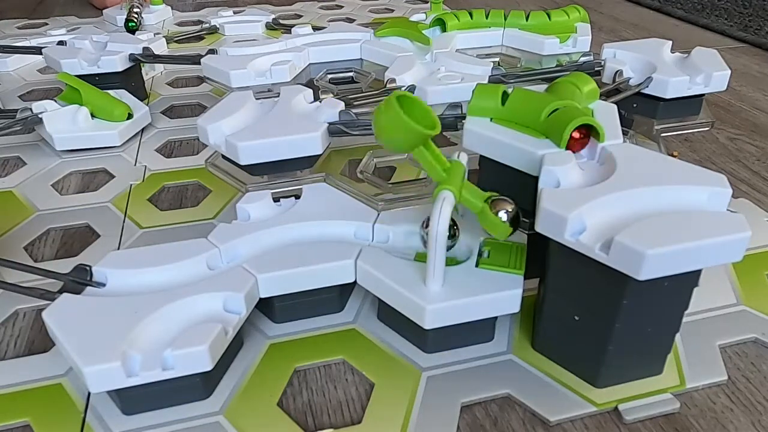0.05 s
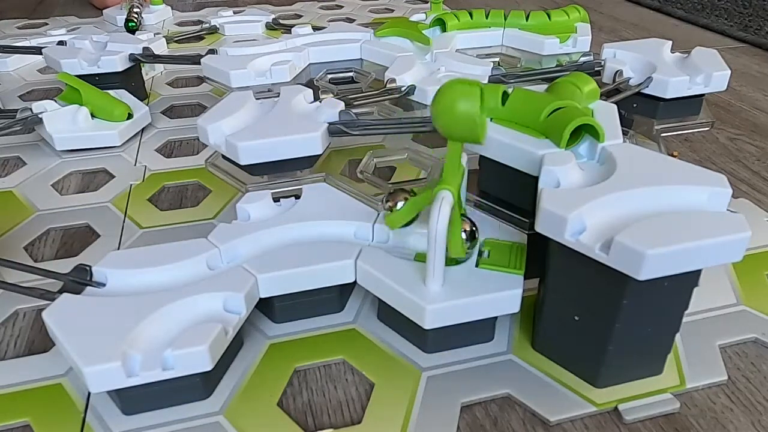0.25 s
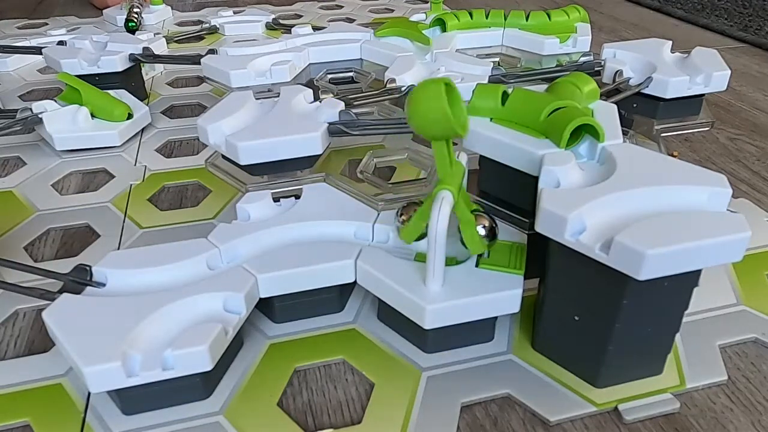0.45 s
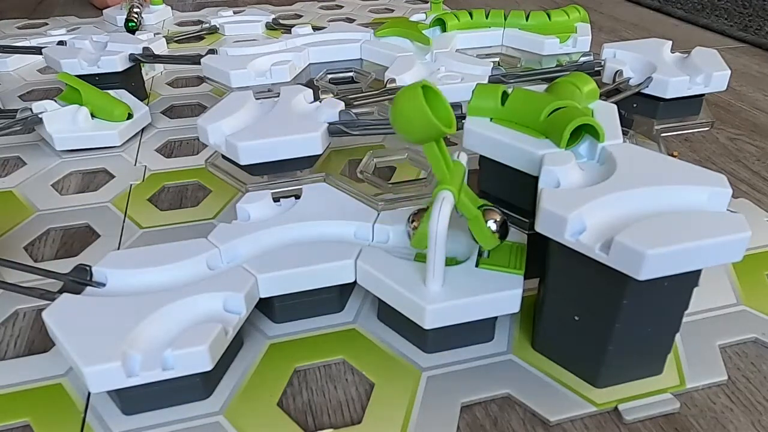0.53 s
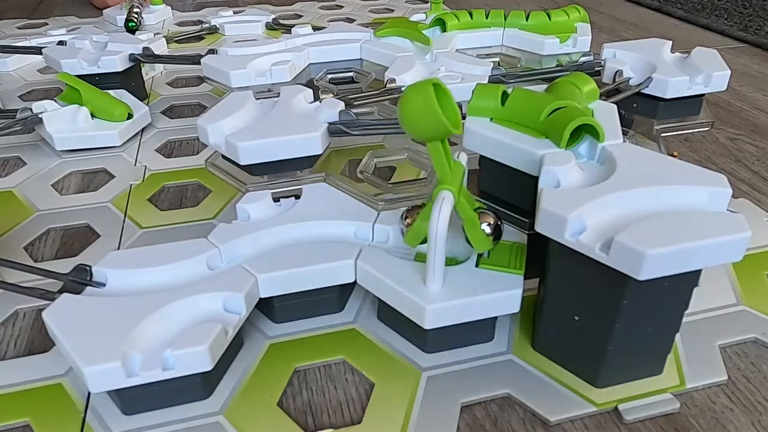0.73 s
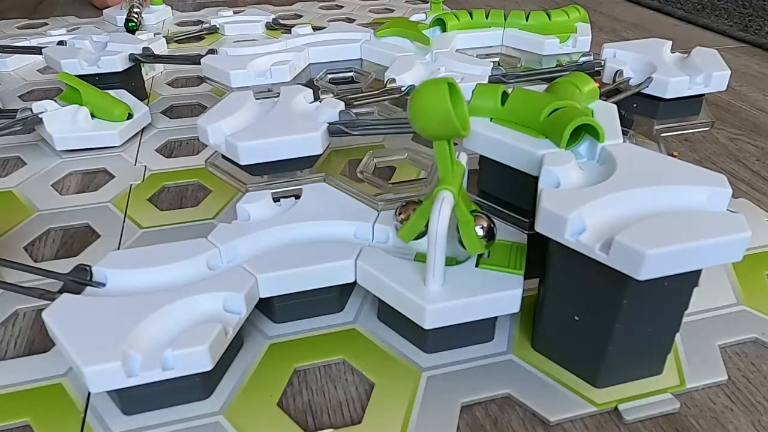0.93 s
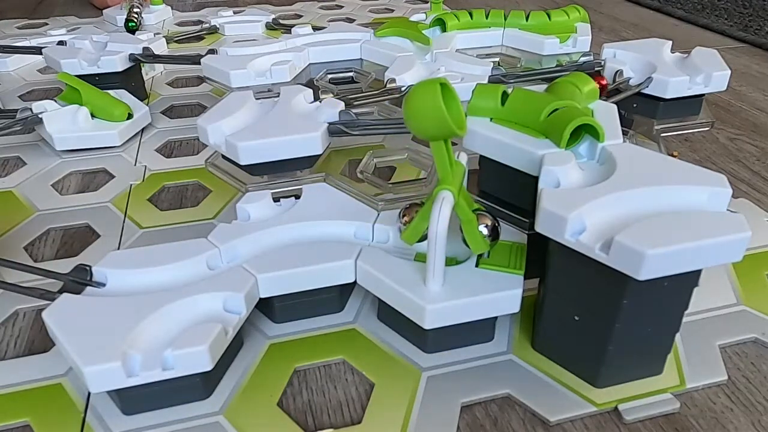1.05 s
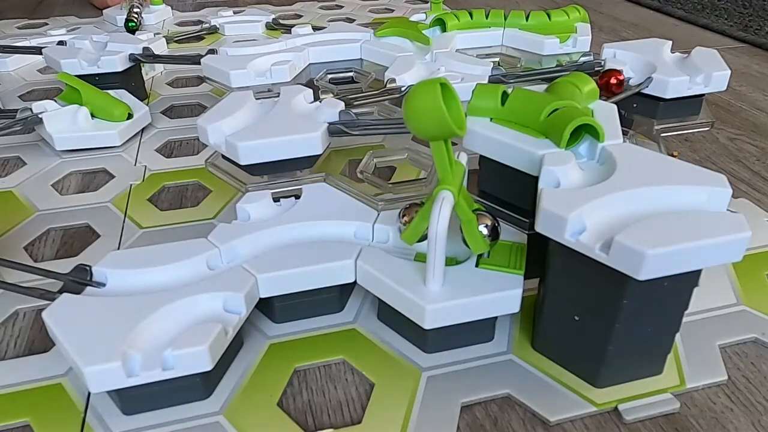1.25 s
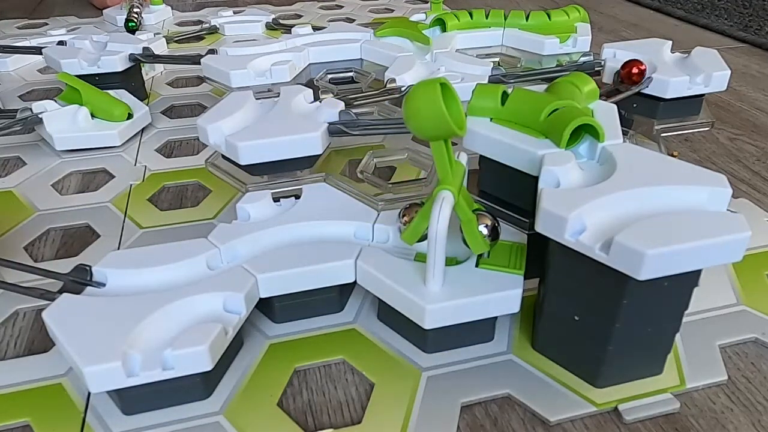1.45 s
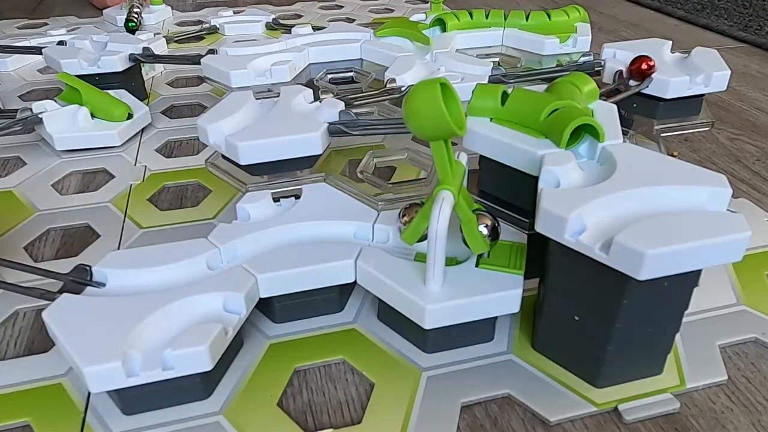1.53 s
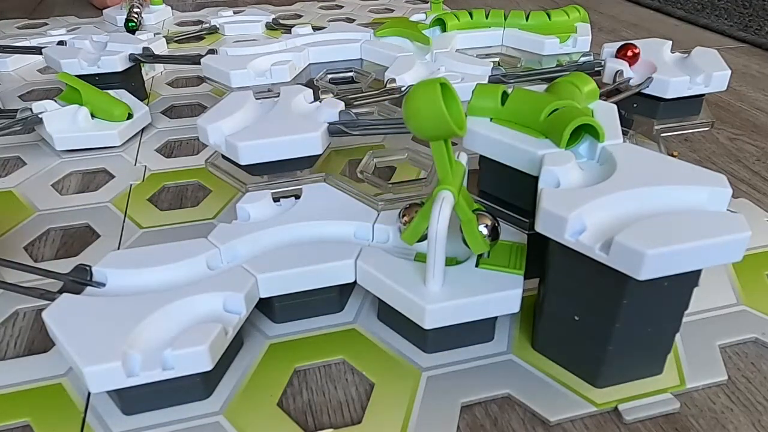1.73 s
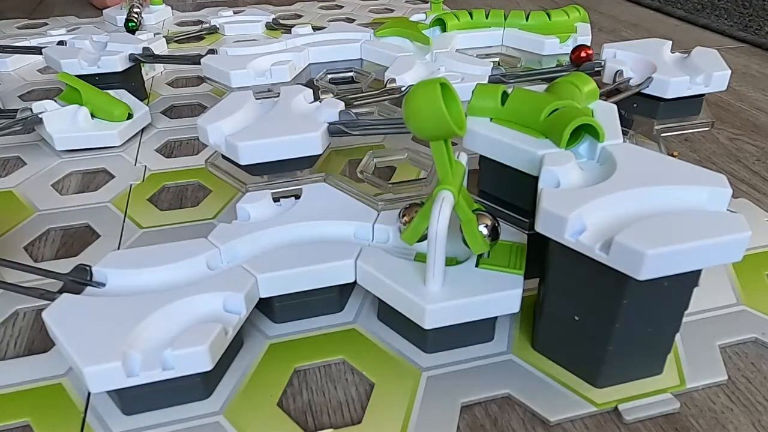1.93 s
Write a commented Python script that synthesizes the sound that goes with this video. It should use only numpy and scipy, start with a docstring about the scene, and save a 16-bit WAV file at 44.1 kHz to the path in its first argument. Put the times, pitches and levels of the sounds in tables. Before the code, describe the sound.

Sharp clacks come from a marble run's swinging plastic lever near the microphone, fading into light taps and chattering steel balls. Then, in the quiet room, a more distant marble ticks over rail joints and rattles into a plastic piece.

```python
"""On the floor of a quiet room, a plastic marble run, close to the microphone and a little to its right.
A lever weighted with steel balls swings down, strikes hard and clacks back and forth until it settles.
Farther off, a marble rolls along a metal rail, knocks over the joints and drops into a hollow plastic
tile. Each contact is a push and a brief rattle coloured by the struck part; lever, cup and rail also
ring at their modes. Faint room noise and a low hum lie underneath."""
import sys
import numpy as np
from scipy import signal
from scipy.fft import rfft, irfft, next_fast_len
from scipy.io import wavfile
from scipy.ndimage import uniform_filter1d, map_coordinates

SR = 44100
rng = np.random.default_rng(int(sys.argv[2]) if len(sys.argv) > 2 else 0)


def master(y):
    """Save y as 16-bit WAV."""
    cut = np.clip(np.atleast_2d(y).T, -1, 1)
    pcm = np.round(cut * 32767)  # scale
    wavfile.write(sys.argv[1], SR, pcm.astype(np.int16))


N = 88200
BLOW_SAMPLES = 8192
T = np.arange(BLOW_SAMPLES) / SR
HZ = np.fft.rfftfreq(BLOW_SAMPLES, 1 / SR)
RISE_S = .0007  # a brief rise that softens the start of each rattle and ping

# spectrum of the room noise: f/Hz, level/dB
AIR_SPECTRUM = [(20, 0.5), (33, -2), (50, -12.5), (75, -8.5), (130, -2), (180, -18.5), (300, -21),
                (700, -27), (2000, -41), (4000, -48.5), (7000, -55), (9500, -69.5)]
# course of the low hum: t/s, level/dB
HUM_LEVEL = [(0, -65), (.6, -63.5), (1, -60), (1.3, -67.5), (1.55, -70.5), (1.72, -60), (1.85, -52),
             (2, -66.5)]
# balls rolling on the plastic track: t/s, level/dB
TRACK_ROLL = [(0, -60.5), (.09, -52.5), (.13, -51.5), (.2, -47.5), (.33, -44.5), (.42, -43), (.5, -48),
              (.62, -56), (.78, -49), (.9, -41.5), (1.02, -76), (1.18, -72), (1.3, -82)]
# balls chattering as the lever settles: t/s, level/dB, brightness/(dB/octave), rattle t60/s
BALL_CHATTER = [(.7655, -45.5, 1, .02), (.772, -49, -3, 0.05), (.779, -41, -3, 0.026),
                (.795, -46, -1.5, .015), (.8145, -40, -1.5, 0.036), (.8315, -45, 1, 0.011),
                (.844, -30, 3, 0.079), (.8505, -35.5, -2, 0.035), (.8575, -37.5, 0.5, .02),
                (.866, -35, -1, 0.02), (.875, -31.5, 0.5, 0.035), (.8815, -60, 13.5, 0.033),
                (.9, -55, 2, 0.044), (.9185, -43, -3.5, .03), (.964, -44.5, -1.5, .02),
                (.9975, -45, -1.5, 0.0077), (1.03, -52.5, -0.5, .025), (1.054, -55.5, -4, 0.017),
                (1.102, -57, -5.5, 0.029)]
# response of the plastic under the balls: f/Hz, level/dB
SEAT_BODY = [(40, -45.5), (200, -25), (500, -16), (820, -4), (1000, -10.5), (1230, 0.5), (1550, -9),
             (2000, 3.5), (2230, -1), (2600, -12), (3600, -22), (5000, -26.5), (5800, -36), (8000, -48.5),
             (10000, -77.5)]
# a steel ball clicking into its plastic cup: t/s, level/dB, brightness/(dB/octave), rattle t60/s
CUP_CLICKS = [(.0435, -27, 0, 0.024), (.056, -40, -11.5, .02), (.111, -43.5, 16, .04),
              (.1365, -34.5, -1, .04)]
# response of the cup: f/Hz, level/dB
CUP_BODY = [(50, -42.5), (250, -21), (800, -20.5), (1150, -7.5), (1800, -4.5), (2650, -10.5), (3000, -4),
            (3350, -12.5), (3750, -4.5), (4050, -11), (4450, -11.5), (4850, -24), (6000, -28.5),
            (8500, -41), (10000, -61.5)]
# modes of the cup: f/Hz, level/dB against the click, t60/s
CUP_MODES = [(1784, -10, .02), (3794, -8, .04)]
# soft bumps in the deep bass: t/s, level/dB
BASS_BUMPS = [(.1, -41.5), (1.219, -41.5)]
# the base plate giving under heavy blows: t/s, level/dB
PLATE_THUDS = [(.2178, -20), (.362, -31), (.378, -30), (.456, -38.5), (.528, -32.5)]
# the plate rumbling under the moving balls: t/s, level/dB
PLATE_ROLL = [(0, -91), (.13, -47), (.2, -56.5), (.34, -41), (.46, -42.5), (.62, -59), (.83, -67),
              (.91, -49.5), (1.05, -72.5), (1.3, -82)]
# response of the plate: f/Hz, level/dB
PLATE_BODY = [(30, -44), (70, -27), (130, -9), (200, -10.5), (330, -8.5), (500, -6.5), (700, -0.5),
              (950, 1), (1600, -23.5), (5000, -68.5)]
# lever and balls clacking on the track: t/s, level/dB, brightness/(dB/octave), rattle t60/s
TRACK_CLACKS = [(.1025, -37, -1, 0.06), (.119, -34, 3, 0.1), (.2975, -32.5, -1, .014),
                (.357, -27, 6, 0.038), (.3635, -25.5, 1, 0.12), (.378, -26, -7, 0.063),
                (.386, -27.5, -2, 0.067), (.456, -30.5, -3.5, 0.033), (.5093, -23, -1.5, 0.036),
                (.516, -27.5, 4, 0.025), (.5208, -22, 3, 0.038), (.529, -32.5, -0.5, 0.04),
                (.5435, -30.5, 0.5, 0.086)]
# response of the track: f/Hz, level/dB
TRACK_BODY = [(40, -43.5), (150, -25), (400, -11.5), (800, -8), (1150, 1.5), (1450, -5), (1700, 1),
              (2200, 5), (2700, -11), (2950, -9.5), (3170, -8), (3450, -8.5), (4000, -15.5), (4700, -19),
              (5050, -15.5), (5700, -28), (7300, -27.5), (9000, -42), (10000, -61.5)]
# strikes of the lever: t/s, level/dB, brightness/(dB/octave)
LEVER_STRIKES = [(0.2123, -11.5, 2), (0.2166, -20, 2.5), (.2445, -32.5, -4), (.297, -35.5, -2),
                 (.322, -37, 0)]
# modes of the lever: f/Hz, level/dB, t60/s
LEVER_MODES = [(738, -19, 0.056), (936, -11.5, 0.046), (1060, 0.5, 0.023), (1037, -8.5, .04),
               (1056, -19.5, 0.31), (1307, -14, 0.026), (1650, -6.5, .03), (1686, -26, 0.41),
               (2320, -13, .016), (2538, -7, 0.0072), (2820, -8.5, .01), (2980, -3.5, 0.0078),
               (3065, -8, 0.025), (5050, -20, .02), (6400, -20, .01)]
# spectrum of the strike's crack: f/Hz, level/dB
CRACK_SPECTRUM = [(200, -27), (900, 8), (3000, 6), (3800, -17), (6500, -8), (8500, -24), (10000, -48.5)]
# light taps of the lever's arm: t/s, level/dB, brightness/(dB/octave), rattle t60/s
ARM_TAPS = [(.6557, -38, -3.5, 0.036), (.6617, -27, -1, 0.026), (.729, -44.5, -7, .02),
            (.7547, -36, -1, 0.018)]
# response of the arm: f/Hz, level/dB
ARM_BODY = [(50, -42), (400, -24), (850, -14.5), (1150, -3), (1650, -1.5), (2250, 2), (2650, -7.5),
            (2930, -10.5), (3150, -1), (3500, -11.5), (3800, -20.5), (4700, -25.5), (5000, -18.5),
            (5700, -35), (7400, -31.5), (10000, -67)]
# modes of the arm: f/Hz, level/dB against the tap, t60/s
ARM_MODES = [(1637, -7.5, 0.032), (3162, -12.5, 0.03)]
# the marble rolling on the rail: t/s, level/dB
RAIL_ROLL = [(0, -99), (1.15, -78.5), (1.25, -62), (1.34, -82), (1.53, -76.5), (1.6, -63), (1.7, -63.5),
             (1.78, -57.5), (1.89, -61), (1.92, -59), (2, -70)]
# its knocks over the joints: t/s, level/dB, brightness/(dB/octave), rattle t60/s
JOINT_KNOCKS = [(1.221, -45.5, 4, 0.088), (1.231, -46, -3.5, 0.049), (1.556, -42, 2, .06),
                (1.5725, -42.5, 0, 0.072), (1.587, -46, -3.5, 0.058), (1.7345, -41, 4, .04),
                (1.749, -44.5, -0.5, .04), (1.7555, -36.5, 0.5, 0.046)]
# response of the rail: f/Hz, level/dB
RAIL_BODY = [(50, -35.5), (250, -11.5), (470, -12.5), (620, 4.5), (800, 1.5), (1100, -5), (1380, -17.5),
             (1650, -6.5), (2000, -8.5), (2220, -6), (2450, -13.5), (2900, -15.5), (3750, -15), (4010, -9),
             (4250, -20.5), (4700, -18.5), (5400, -30.5), (7500, -42.5), (10000, -64.5)]
# modes of the steel rail: f/Hz, level/dB against the knock, t60/s
RAIL_MODES = [(2145, -21, .15), (4016, -27, 0.1)]
# the marble's bounces in the tile: t/s, level/dB, brightness/(dB/octave), rattle t60/s
TILE_BOUNCES = [(1.903, -31.5, 0.5, 0.11), (1.913, -33, -5, 0.087), (1.935, -36, -7, 0.016),
                (1.942, -35.5, 1.5, 0.068), (1.9555, -31, 0, 0.063), (1.9615, -34, 3, 0.017),
                (1.975, -33, 0, 0.13)]
# response of the hollow tile: f/Hz, level/dB
TILE_BODY = [(50, -53), (230, -18), (340, -4.5), (430, -3.5), (520, 1), (800, 3), (1150, -2), (1450, -16),
             (1650, -12), (2000, -19), (2400, -16), (3000, -23), (3750, -18.5), (3980, -7.5), (4250, -31),
             (4600, -25), (5500, -34.5), (7500, -47.5), (10000, -66)]
# reverberation time of the room: f/Hz, t60/s
ROOM_DECAY = [(100, .45), (500, 0.32), (1400, 0.66), (3500, 0.65), (9000, .32)]
# colour of the reverberation: f/Hz, level/dB
ROOM_COLOUR = [(100, 7), (500, -10), (1000, -4.5), (2200, -13.5), (4000, -11.5), (9000, -13)]
# likeness of the room's sound left and right: f/Hz, correlation
ROOM_COHERENCE = [(100, 0.88), (400, 0.34), (900, .45), (1800, 0.2), (9000, 0.2)]
# direct sound at the microphone, left minus right: f/Hz, level/dB
MIC_BALANCE = [(100, -3.5), (1000, -1.2), (2200, 0.5), (3000, -2), (3900, 0), (5000, -7.5), (6000, -8.5),
               (7500, -5), (9000, -6.5)]


def amp(db):
    """Decibels to gain."""
    return 10 ** (np.asarray(db) / 20)


def unit(x):
    """Scale to rms 1."""
    return x / np.sqrt(np.mean(x ** 2) + 1e-20)


def along(points, hz):
    """Read (f/Hz, value) points on a log frequency axis."""
    freqs, values = np.transpose(points)
    return np.interp(np.log(hz + 1), np.log(freqs + 1), values)


def level(points):
    """Gain per sample from (t/s, level/dB) points."""
    return amp(np.interp(np.arange(N) / SR, *np.transpose(points)))


def fade(t, t60):
    """Exponential decay, 60 dB down at t60."""
    return np.exp(-np.log(1000) * t / t60)


def filtered(x, response):
    """Filter x by a function of frequency."""
    size = next_fast_len(N + SR // 2)
    return irfft(rfft(x, size) * response(np.fft.rfftfreq(size, 1 / SR)), size)[..., :N]


def coloured(x, db):
    """A short sound through a minimum-phase filter with these gains."""
    cepstrum = irfft(np.log(amp(db)))
    cepstrum[1:BLOW_SAMPLES // 2] *= 2
    cepstrum[BLOW_SAMPLES // 2 + 1:] = 0
    return irfft(rfft(x) * np.exp(rfft(cepstrum)))


def tilt(db_per_octave):
    """Spectral slope in dB: a harder contact is brighter."""
    return db_per_octave * np.log2(np.clip(HZ, 400, 8000) / 1500)


def add_blow(out, at_s, db, blow):
    """Place a blow; its level is its energy spread over 5 ms."""
    start = round(at_s * SR)
    blow = blow[:N - start] * amp(db) * np.sqrt(.005 * SR) / np.linalg.norm(blow)
    out[start:start + len(blow)] += blow


def contact(body, bright, t60, push):
    """One push and a dense, quickly dying rattle, evened in spectrum and coloured by the struck part."""
    force = rng.standard_normal(BLOW_SAMPLES) * fade(T, t60) * (1 - np.exp(-T / RISE_S))
    force /= np.linalg.norm(force)
    force[0] += push
    smooth_power = uniform_filter1d(np.abs(rfft(force)) ** 2, 70)
    uneven_db = 10 * np.log10(np.abs(smooth_power) + 1e-9)
    return unit(coloured(force, along(body, HZ) + tilt(bright) - uneven_db))


def blows(contacts, body, push):
    """A series of contacts on one part."""
    out = np.zeros(N)
    for at_s, db, bright, t60 in contacts:
        add_blow(out, at_s, db, contact(body, bright, t60, push))
    return out


def pings(contacts, modes, ring_db=0):
    """Each contact sets a part's modes ringing, slightly detuned every time."""
    out = np.zeros(N)
    for at_s, db, _, _ in contacts:
        for hz, mode_db, t60 in modes:
            tone = np.sin(2 * np.pi * hz * (1 + 0.0035 * rng.normal()) * T)
            ping = tone * fade(T, t60) * (1 - np.exp(-T / RISE_S))
            add_blow(out, at_s, db + mode_db + ring_db, ping)
    return out


def rolling(course, body, bumps_per_s=1000, spread_db=3.5):
    """Tiny random bumps under a rolling ball excite the part that carries it."""
    hits = rng.random(N) < bumps_per_s / SR
    bumps = hits * amp(spread_db * rng.standard_normal(N)) * rng.choice([-1, 1], N)
    tick = contact(body, bright=0, t60=0.0059, push=0.8)
    return unit(signal.fftconvolve(bumps, tick)[:N]) * level(course)


def diffuse(pair):
    """Two unrelated signals to a stereo field that is alike in the bass."""
    def mid_side_gains(hz):
        angle = np.arccos(np.clip(along(ROOM_COHERENCE, hz), -1, 1)) / 2
        return np.array([np.cos(angle), np.sin(angle)])
    mid, side = filtered(pair, mid_side_gains)
    return np.array([mid + side, mid - side])


def wobble(count):
    """A smooth drift through about count random values."""
    return map_coordinates(rng.standard_normal(count + 2), [np.arange(N) * count / N])


def room_tone(air_db=-59, hum_hz=97.4, swing_db=2.5):
    """Faint noise all round the microphone, with an uneven rumble and a wavering low hum."""
    noise = diffuse(rng.standard_normal((2, N)))
    air = unit(filtered(noise, lambda hz: amp(along(AIR_SPECTRUM, hz))))
    rumble = filtered(air, lambda hz: 1 / (1 + (hz / 160) ** 4))
    hum = np.sqrt(2) * np.sin(2 * np.pi * hum_hz * np.arange(N) / SR + 1.7 * wobble(16))
    air += rumble * (amp(swing_db * wobble(16)) - 1)
    return amp(air_db) * air + hum * level(HUM_LEVEL) * amp(swing_db * wobble(30))


def balls():
    """Steel balls roll on the plastic and chatter as the lever settles."""
    return blows(BALL_CHATTER, SEAT_BODY, push=0.28) + rolling(TRACK_ROLL, SEAT_BODY)


def cup():
    """A steel ball clicks into its plastic cup, which pings."""
    return blows(CUP_CLICKS, CUP_BODY, push=0.33) + pings(CUP_CLICKS, CUP_MODES)


def base_plate(thud_t60=0.039, bump_hz=31, bump_t60=.13):
    """The plate thuds under heavy blows and rumbles under the balls; two soft bumps sound far below."""
    thuds = [(at_s, db, 0, thud_t60) for at_s, db in PLATE_THUDS]
    out = blows(thuds, PLATE_BODY, push=0.73) + rolling(PLATE_ROLL, PLATE_BODY)
    bump = np.sin(2 * np.pi * bump_hz * T) * T * fade(T, bump_t60)
    for at_s, db in BASS_BUMPS:
        add_blow(out, at_s, db, bump)
    return out


def track():
    """Lever and balls clack against the plastic track."""
    return blows(TRACK_CLACKS, TRACK_BODY, push=0.46)


def lever(attack_s=0.0001, crack_db=-11, cut_hz=700):
    """Each strike cracks and rings the lever's modes; so small a part radiates little below cut_hz."""
    out = np.zeros(N)
    low_cut_db = -10 * np.log10(1 + (cut_hz / (HZ + 20)) ** 4)
    for at_s, db, bright in LEVER_STRIKES:
        ring = sum(amp(mode_db + rng.normal()) * np.sin(2 * np.pi * hz * T) * fade(T, t60)
                   for hz, mode_db, t60 in LEVER_MODES)
        ring = unit(ring * (1 - np.exp(-T / attack_s)))
        crack = amp(crack_db) * contact(CRACK_SPECTRUM, bright=0, t60=.028, push=.2)
        add_blow(out, at_s, db, coloured(ring + crack, tilt(bright) + low_cut_db))
    return out


def lever_arm():
    """The arm taps lightly and pings as its swing narrows."""
    return blows(ARM_TAPS, ARM_BODY, push=0.24) + pings(ARM_TAPS, ARM_MODES)


def rail():
    """The marble rolls along the steel rail, which rings on after each knock at a joint."""
    knocks = blows(JOINT_KNOCKS, RAIL_BODY, push=0.11)
    return knocks + pings(JOINT_KNOCKS, RAIL_MODES) + rolling(RAIL_ROLL, RAIL_BODY)


def tile():
    """The marble drops into the hollow tile and rattles round, faintly ringing the rail."""
    return blows(TILE_BOUNCES, TILE_BODY, push=0.16) + pings(TILE_BOUNCES, RAIL_MODES, ring_db=-11)


def in_room(x, wet_db, build_s, lag_s):
    """Direct sound reaches the microphone's right side first; the room's answer builds and dies away."""
    hz, t, noise = signal.stft(rng.standard_normal((2, SR * 3 // 4)), SR, nperseg=256)
    decay = fade(t, along(ROOM_DECAY, hz)[:, None])
    build_up = 1 - np.exp(-(t / build_s) ** 2)
    _, tail = signal.istft(noise * decay * build_up, SR, nperseg=256)
    wet = signal.fftconvolve(x[None], tail / np.linalg.norm(tail[0]), axes=1)[:, :N]
    wet = filtered(diffuse(wet), lambda f: amp(wet_db + along(ROOM_COLOUR, f)))
    sides = np.array([[.5], [-.5]])  # left, right
    balance = lambda f: amp(sides * along(MIC_BALANCE, f))
    delay = lambda f: np.exp(-2j * np.pi * f * sides * lag_s)
    return wet + filtered(x, lambda f: balance(f) * delay(f))


def scene():
    """Lever and track close to the microphone, rail and tile farther off, the room all round."""
    return (room_tone()
            + in_room(balls(), wet_db=-4.5, build_s=0.022, lag_s=.00007)
            + in_room(cup() + lever_arm(), wet_db=-6, build_s=0.0092, lag_s=.00007)
            + in_room(base_plate() + lever(), wet_db=-8.0, build_s=0.02, lag_s=.000085)
            + in_room(track(), wet_db=-0.5, build_s=0.0056, lag_s=.00007)
            + in_room(rail() + tile(), wet_db=-3, build_s=0.0047, lag_s=.000095))


def record(dry):
    """The treble at the microphone falls to nothing at top_hz."""
    top_hz, slope_hz = 9975, 500
    return filtered(dry, lambda hz: np.clip((top_hz - hz) / slope_hz, 0, 1))


dry = scene()
out = record(dry)
master(out)
```